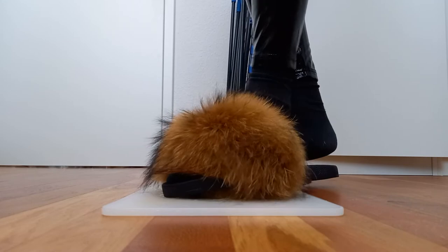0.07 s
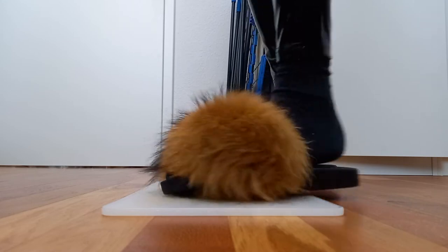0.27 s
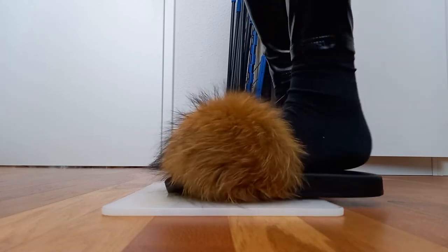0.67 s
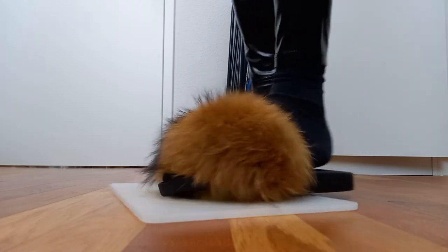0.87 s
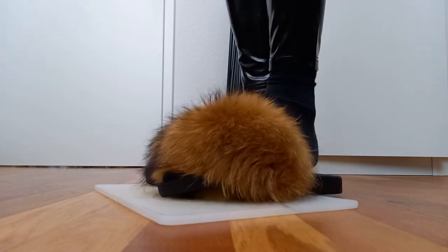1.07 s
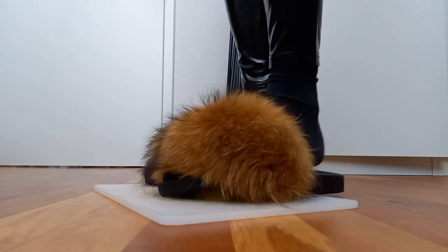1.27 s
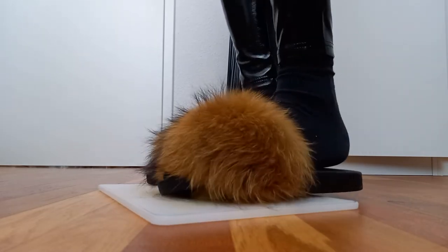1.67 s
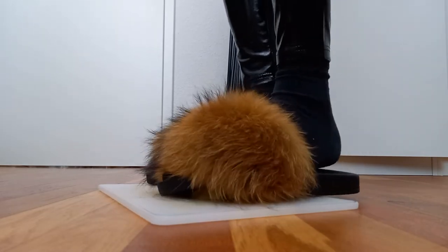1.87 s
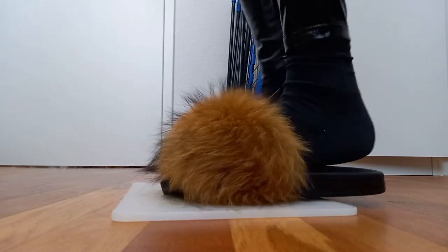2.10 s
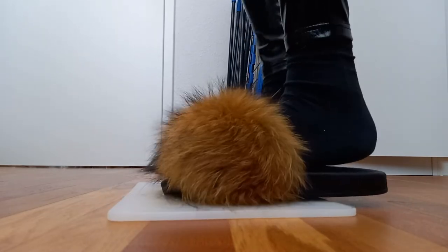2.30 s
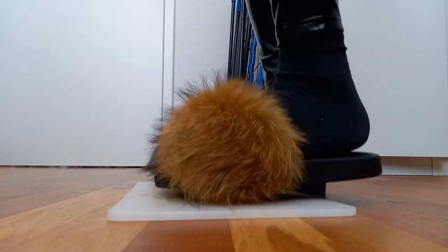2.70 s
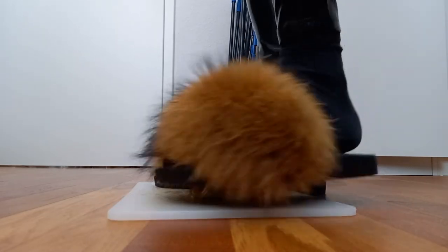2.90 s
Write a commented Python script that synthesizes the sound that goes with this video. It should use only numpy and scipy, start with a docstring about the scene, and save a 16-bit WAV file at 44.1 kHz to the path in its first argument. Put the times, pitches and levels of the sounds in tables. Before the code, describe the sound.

Close up in a quiet small room, rubber soles rub and squeak as furry slippers shift on a plastic board. Low judders and a soft knock follow, then a sticky crackle as one sole lifts, with faint fur swishes throughout.

```python
"""Rubber soles scuff, squeak and judder as furry slippers shift on a plastic board in a small room.
Countless tiny slips make the scuffs; gripping and slipping in a rhythm makes the squeaks and groans.
Tacky spots snap loose, and near the end a sole peels off with a crackle. The board knocks on the
wooden floor beneath it. Fur and fabric swish faintly over quiet room noise."""
import sys
import numpy as np
from scipy import signal
from scipy.fft import rfft, irfft
from scipy.io import wavfile

SR = 44100
rng = np.random.default_rng(int(sys.argv[2]) if len(sys.argv) > 2 else 0)


def generate_wav(sig):
    """Save sig (samples, or channels by samples) to the path in sys.argv[1] as 16-bit PCM at SR."""
    pcm = np.round(np.clip(np.atleast_2d(sig).T, -1, 1) * 32767).astype(np.int16)
    wavfile.write(sys.argv[1], SR, pcm)


N = 134505
T = np.arange(N) / SR
HZ = np.fft.rfftfreq(2 * N, 1 / SR)


def amp(db):
    """Turns decibels into a number to multiply by."""
    return 10 ** (np.asarray(db) / 20)


def unit(x):
    """Scales a signal to an average strength (rms) of 1."""
    return x / np.sqrt(np.mean(x ** 2) + 1e-20)


def read(points, hz=HZ):
    """Joins a table's points into a curve over frequency."""
    point_hz, value = np.transpose(points)
    return np.interp(np.log(hz + 1), np.log(point_hz), value)


def add(mix, start_s, sound):
    """Adds a sound to the mix at the given time."""
    part = mix[:, max(round(start_s * SR), 0):][:, :sound.shape[-1]]
    part += sound[..., :part.shape[1]]


def tone_filter(points, bass_db=0, rasp_db=0, treble_db=0, air_db=0, size=2048):
    """Builds a filter from a tone table and four tone controls."""
    bass_hz, rasp_hz, treble_hz, air_hz = 327, 1630, 2720, 11000
    hz = abs(np.fft.fftfreq(size, 1 / SR)) + 1
    db = read(points, hz) + bass_db / (1 + (hz / bass_hz) ** 4)
    db += rasp_db * np.exp(-(2 * np.log2(hz / rasp_hz)) ** 2)
    db += treble_db / (1 + (treble_hz / hz) ** 2) + air_db / (1 + (air_hz / hz) ** 4)
    spectrum = np.exp(signal.hilbert(np.log(amp(db))).conj())  # rings only after a hit, never before
    response = np.fft.ifft(spectrum).real[:size // 2]
    return response / np.linalg.norm(response)


def through(x, response):
    """Passes both channels through a filter."""
    return signal.oaconvolve(x, np.atleast_2d(response), axes=1)[:, :N]


def stroke(full, rise, hold, fall):
    """Loudness that swells 20 dB in `rise` seconds, holds, then drops 20 dB every `fall` seconds."""
    swell = (np.maximum(full - T, 0) / rise) ** 1.4
    fade = np.maximum(T - full - hold, 0) / fall
    return 10 ** -(swell + fade)


def wander(rate_hz):
    """A smooth random wiggle; a higher rate wiggles faster."""
    return unit(irfft(rfft(rng.standard_normal(2 * N)) * np.exp(-(HZ / rate_hz) ** 2))[:N])


def grains(per_s, spread_db):
    """Tiny random clicks, each with its own strength on the left and right."""
    size = amp(spread_db * np.minimum(rng.exponential(1, N), 4))
    happens = rng.random(N) < per_s / SR
    return unit(size * happens * rng.standard_normal((2, N)))


# how alike left and right sound (frequency [Hz], likeness [0-1])
STEREO_LIKENESS = [(50, 0.59), (250, 0.72), (550, 0.58), (1100, 0.3), (2400, 0.063), (5000, 0),
                   (15000, 0.024)]
def pair(x):
    """Makes two unrelated channels alike in the bass, as at two close microphones."""
    first, second = rfft(x, 2 * N)
    like = read(STEREO_LIKENESS)
    mid, side = first * np.sqrt((1 + like) / 2), second * np.sqrt((1 - like) / 2)
    return irfft(np.array([mid + side, mid - side]))[:, :N]


# how long the room rings (frequency [Hz], time to fade 60 dB [s])
ECHO_TIMES = [(100, 0.22), (500, 0.23), (2000, 0.26), (5000, 0.25), (14000, 0.13)]
def room(x, echo_db, onset_s=0.0023):
    """Adds the small room's echo, which dies fastest in the highest notes."""
    hz, t, bands = signal.stft(rng.standard_normal((2, SR // 2)), SR, nperseg=256)
    fade = amp(-60 * t / read(ECHO_TIMES, hz)[:, None])
    tail = signal.istft(bands * fade, SR, nperseg=256)[1]
    onset = np.minimum(T[:tail.shape[1]] / onset_s, 1) ** 2
    tail = pair(tail * onset)[:, :SR // 2]
    return x + amp(echo_db) * through(x[[0, 0]], tail / np.linalg.norm(tail[0]))


# tone of the room noise (frequency [Hz], relative level [dB])
HUSH_TONE = [(20, -1), (35, -15), (55, -2), (90, 4), (200, -3), (400, -3.5), (530, 4.5), (850, -1.5),
             (1400, -9.5), (2200, -27), (4500, -14.5), (7000, -18.5), (12000, -18.5), (16000, -22.5)]
def hush(level_db=-68.5, waver_db=2.5):
    """Quiet, low room noise whose level wavers."""
    spectrum = rfft(rng.standard_normal((2, 2 * N))) * amp(read(HUSH_TONE))
    noise = unit(irfft(spectrum)[:, :N])
    return pair(noise) * amp(level_db + waver_db * wander(rate_hz=18))


# tone of brushed fur (frequency [Hz], relative level [dB])
FUR_TONE = [(200, -24), (1500, 2), (4500, 10), (7000, 5), (9500, 1.5), (12500, 4.5), (16000, -10)]
# brushing moves (full at [s], rise [s], hold [s], fall [s], level [dB], highest hiss [dB])
FUR_STROKES = [(0.175, 0.12, 0.25, 0.17, -65.5, -4), (0.252, 0.0024, .003, 0.03, -57, 6),
               (0.615, 0.0064, .045, 0.18, -69, -14), (0.812, 0.097, 0.054, 0.38, -65, 0),
               (1.057, 0.16, 0.022, 0.34, -66.5, 9), (1.35, .1, 0.12, 0.086, -69, -1),
               (1.495, 0.027, 0.009, 0.072, -63, 6), (1.682, 0.045, .025, 0.05, -65, 10),
               (2.075, .09, 0.041, 0.086, -56.5, -2), (2.321, .002, .002, 0.13, -68, -6),
               (2.637, 0.051, 0.12, .16, -59.5, 18), (2.74, 0.0031, 0.0036, 0.013, -50, 10),
               (3.003, .15, 0.063, .1, -66.5, 3)]
def fur_swishes():
    """Hairs and fabric brush past each other with a fine hiss."""
    out = np.zeros((2, N))
    for *timing, db, air_db in FUR_STROKES:
        touches = grains(per_s=12000, spread_db=-0.5) * stroke(*timing) * amp(db)
        out += through(touches, tone_filter(FUR_TONE, air_db=air_db))
    return pair(out)


# the board's own notes (pitch [Hz], relative level [dB], time to fade 60 dB [s])
BOARD_NOTES = [(131.6, -3.5, 0.078), (250, -2, 0.1), (344.7, -8.5, 0.28), (410, -19, 0.13),
               (462.2, -15, 0.14), (537, -7.5, 0.093), (664, -26, 0.07), (694, -2, 0.066), (829, -8, 0.061),
               (1141, -7, 0.11), (1366, -18.5, 0.089), (1476, -9, 0.052), (1710, -22, 0.29)]
def board_ring():
    """One tap makes the board ring with several fading notes at once."""
    t = T[:SR // 3]
    return sum(amp(db - 60 * t / fade_s) * np.cos(2 * np.pi * hz * t) for hz, db, fade_s in BOARD_NOTES)


# the board hitting the floor (time [s], level [dB])
BOARD_TAPS = [(2.3245, -51.5), (2.351, -51.5), (3.043, -58)]
def board_knocks(click_s=0.011, muffle_hz=1150):
    """The board taps the floor with a click and a ring, cushioned by the sole."""
    out, ring = np.zeros((2, N)), board_ring()
    click = amp(0.5) * rng.standard_normal(len(ring)) * np.exp(-T[:len(ring)] / click_s)
    cushion = signal.butter(2, [50, muffle_hz], "band", fs=SR, output="sos")
    tap = signal.sosfilt(cushion, ring / 2 + click)
    for start_s, db in BOARD_TAPS:
        add(out, start_s, amp(db) * tap / np.std(tap[:1024]))
    return out


# tone of peeling rubber (frequency [Hz], relative level [dB])
PEEL_TONE = [(60, -46), (250, -18), (550, 0), (1000, 1.5), (1800, -1), (3000, -4.5), (5000, -10),
             (7500, -17), (12000, -21), (16000, -20)]
# a sole lifting away (full at [s], rise [s], hold [s], fall [s], level [dB])
PEEL_STROKES = [(1.192, 0.028, 0.013, 0.072, -56), (2.587, 0.0055, 0.03, 0.15, -54.5),
                (2.88, 0.004, 0.011, 0.055, -58.5), (2.624, 0.049, 0.091, 0.057, -46)]
def sole_peels():
    """Rubber unsticks from the plastic in a run of tiny cracks."""
    loudness = sum(amp(db) * stroke(*timing) for *timing, db in PEEL_STROKES)
    cracks = grains(per_s=3200, spread_db=2.5) * loudness
    return pair(through(cracks, tone_filter(PEEL_TONE)))


# tone of one snap (frequency [Hz], relative level [dB])
SNAP_TONE = [(60, -12), (250, -16), (550, -1.5), (1000, 2.5), (1800, -1.5), (3000, -7), (5000, -8.5),
             (7500, -23), (12000, -17), (16000, -43)]
# tacky spots coming loose (time [s], level [dB], treble [dB])
STICKY_SPOTS = [(0.602, -60, -10), (1.004, -52.5, -2), (1.012, -57, -1), (1.06, -60, 8),
                (1.1858, -55.5, 5.5), (1.335, -63.5, -3), (1.634, -66, -5), (1.989, -58.5, -47),
                (2.472, -65.5, -5), (2.5781, -44, -5), (2.626, -44, -4), (2.667, -49, 10),
                (2.722, -45, -10), (2.7448, -45, 7), (2.768, -51, -44), (2.815, -53.5, 5),
                (2.875, -52.5, -9)]
def sole_snaps(snap_s=0.0016, rustle_db=-15, rustle_s=0.011, size=4096):
    """Each tacky spot of rubber lets go in a sharp burst with a short rustle behind it."""
    out, t = np.zeros((2, N)), T[:size]
    fade = np.exp(-t / snap_s) + amp(rustle_db) * np.exp(-t / rustle_s)
    for start_s, db, treble_db in STICKY_SPOTS:
        noise = rng.standard_normal((2, size)) * fade
        burst = through(noise, tone_filter(SNAP_TONE, treble_db=treble_db))
        add(out, start_s, amp(db) * burst / np.std(burst[:, :size // 8]))
    return pair(out)


# a sole gripping and slipping (full at [s], rise [s], hold [s], fall [s], level [dB],
# first pitch [Hz], last pitch [Hz], roughness [0-1], overtones weaken above [Hz])
JUDDER_STROKES = [(0.080, 0.012, 0.014, .035, -57, 143.8, 117, 0.4, 208),
                  (0.359, 0.044, 0.053, 0.051, -40, 438.5, 437.5, 0.04, 620),
                  (0.35, 0.084, 0.048, 0.026, -42.5, 793, 785, 0.08, 580),
                  (0.409, 0.01, 0.0068, 0.013, -44, 800, 666, 0.05, 600),
                  (0.442, 0.019, 0.013, .035, -44, 400, 323, 0.31, 394),
                  (0.832, 0.028, 0.026, 0.091, -51, 254.5, 252, 0.01, 150),
                  (0.968, 0.063, .06, 0.04, -60.5, 149.2, 133, 0.74, 327),
                  (1.689, 0.019, 0.032, 0.077, -48, 134, 128, 0.4, 278),
                  (1.704, .03, 0.1, 0.069, -64.5, 58, 55.4, .5, 60),
                  (1.77, 0.085, 0.057, 0.093, -58, 130.1, 124, 0.63, 270),
                  (1.857, 0.035, 0.032, 0.055, -55.5, 115, 71.1, 0.4, 174),
                  (1.887, .02, 0.02, .03, -54.5, 70, 51.5, .1, 55),
                  (2.136, 0.018, 0.01, 0.096, -55.5, 270.7, 250.6, 0.27, 220),
                  (2.358, 0.037, 0.012, 0.045, -44.5, 138, 128, 0.24, 263)]
def sole_judders(wobble=0.38, flutter=0.13):
    """Rubber grips and slips over and over: fast cycles squeak, slow ones groan and thud."""
    out, harmonics = np.zeros(N), np.arange(1, 12)  # whole multiples of the pitch
    for full, rise, hold, fall, db, first_hz, last_hz, rough, body_hz in JUDDER_STROKES:
        glide_hz = np.interp(T, [full - rise / 2, full + hold + fall / 2], [first_hz, last_hz])
        cycles = np.cumsum(glide_hz * (1 + wobble * rough * wander(first_hz))) / SR
        ratio = harmonics * (first_hz + last_hz) / 2 / body_hz
        weights = ratio ** 0.65 / (2 + ratio ** 4.48)  # climbs gently, then drops steeply
        slips = sum(weight * np.sin(2 * np.pi * (k * cycles + rng.random()))
                    for k, weight in zip(harmonics, weights))
        tremble = 1 + (flutter + rough / 2) * wander(0.31 * first_hz)
        out += amp(db) * stroke(full, rise, hold, fall) * unit(slips * tremble)
    return np.array([out, out])


# tone of rubber rubbing plastic (frequency [Hz], relative level [dB])
SCUFF_TONE = [(40, -21), (100, -17), (180, -12), (260, -9), (450, 1.5), (680, 0.5), (950, -1), (1200, -1),
              (1500, -4), (1900, -8), (2450, -8.5), (3200, -11.5), (4600, -15.5), (6500, -30.5),
              (9500, -38), (12500, -36), (16000, -48)]
# a sole sliding (full at [s], rise [s], hold [s], fall [s], level [dB], bass [dB], rasp [dB],
# treble [dB])
SCUFF_STROKES = [(0.004, 0.065, 0.015, 0.04, -67.5, 6, 3, -1),
                 (0.114, 0.016, 0.02, 0.026, -56, 0, -14, -24),
                 (0.185, 0.059, 0.13, 0.13, -51.5, -1, -4, 4),
                 (0.296, 0.062, 0.063, 0.088, -47, -6.5, -3, -0.5),
                 (0.395, 0.11, 0.046, 0.038, -41, -15, -2.5, 3),
                 (0.459, 0.058, 0.013, 0.055, -38.5, -2, 5, -1),
                 (0.815, 0.059, 0.15, 0.11, -52.5, 6, -0.5, -5.5),
                 (1.35, 0.029, .04, 0.088, -63.5, 10, 6, 6), (1.451, 0.057, 0.03, 0.084, -43.5, 3.5, 2, -2),
                 (1.64, 0.02, 0.055, .08, -64, -10, 8, 0), (1.881, 0.053, 0.011, 0.093, -66, -5, -1, -20),
                 (2.051, 0.053, 0.061, 0.074, -40, -3, 4, 3), (2.14, 0.024, 0.011, 0.1, -50.5, 17.5, 5, -4),
                 (2.346, 0.019, 0.049, .048, -51, 25, 2, -19),
                 (2.491, 0.032, 0.065, 0.055, -63.5, -8, 6.5, 16),
                 (2.818, 0.039, 0.14, .2, -63.5, 4, 5.5, 4.5), (3.018, 0.042, 0.02, .1, -60.5, 16, 5, -16)]
def sole_scuffs(ring_db=-48.5):
    """A sliding sole makes thousands of tiny slips a second, which also ring the board a little."""
    out = np.zeros((2, N))
    for *timing, db, bass_db, rasp_db, treble_db in SCUFF_STROKES:
        slips = grains(per_s=8000, spread_db=0.65) * stroke(*timing) * amp(db)
        out += through(slips, tone_filter(SCUFF_TONE, bass_db, rasp_db, treble_db))
    return pair(out + amp(ring_db) * through(out, board_ring()))


def scene():
    """All the footwork, each sound with its own amount of echo, over the room noise."""
    return (room(sole_scuffs(), echo_db=-13) + room(fur_swishes(), echo_db=-13)
            + room(sole_judders(), echo_db=-9.5) + room(board_knocks(), echo_db=-3)
            + room(sole_snaps(), echo_db=-2) + room(sole_peels(), echo_db=-9) + hush())


# which side is louder (frequency [Hz], left minus right [dB])
SIDE_BALANCE = [(60, -1.5), (550, -2), (1600, .5), (4500, -1.5), (9000, 2), (15000, 2.5)]
def record(dry, lowest_hz=45, highest_hz=15900):
    """Sets the left-right balance, then trims the deepest rumble and the highest hiss."""
    side_gains = amp(np.outer([.5, -.5], read(SIDE_BALANCE)))
    balanced = irfft(rfft(dry, 2 * N) * side_gains)[:, :N]
    low_cut = signal.butter(4, lowest_hz, "high", fs=SR, output="sos")
    high_cut = signal.firwin(511, highest_hz, window=("kaiser", 9), fs=SR)
    return signal.oaconvolve(signal.sosfilt(low_cut, balanced), high_cut[None], "same")


dry = scene()
out = record(dry)
generate_wav(out)
```